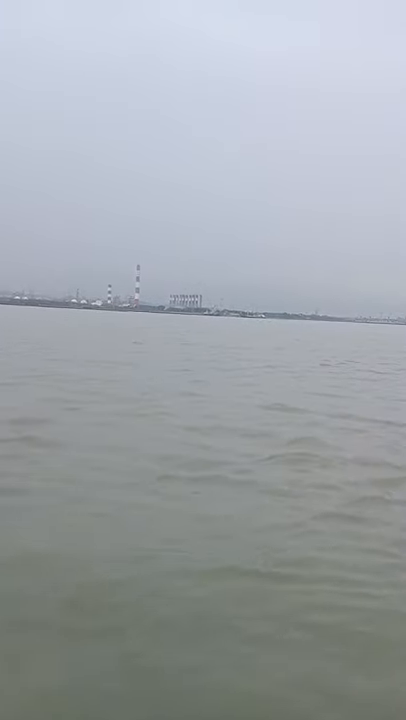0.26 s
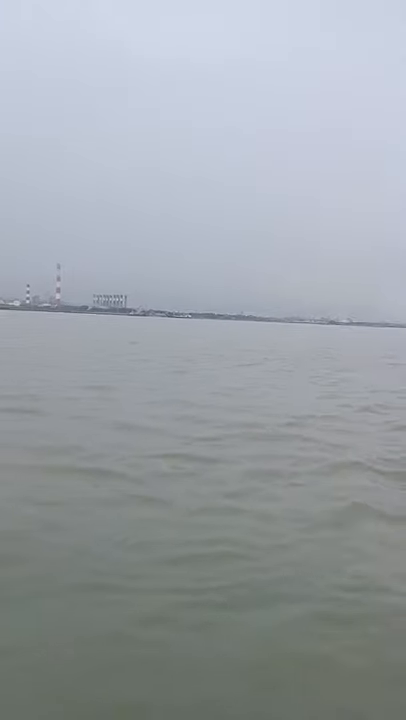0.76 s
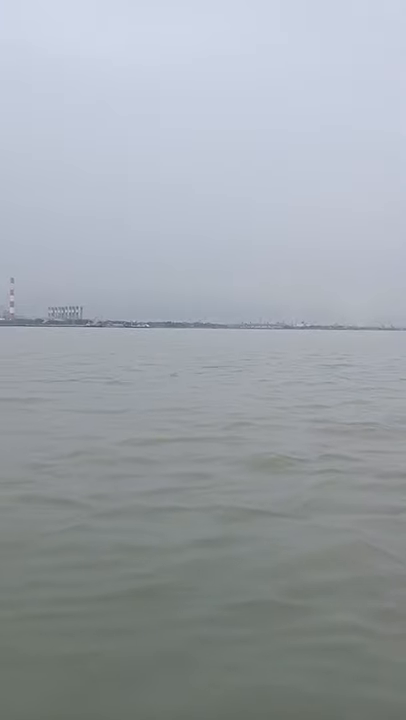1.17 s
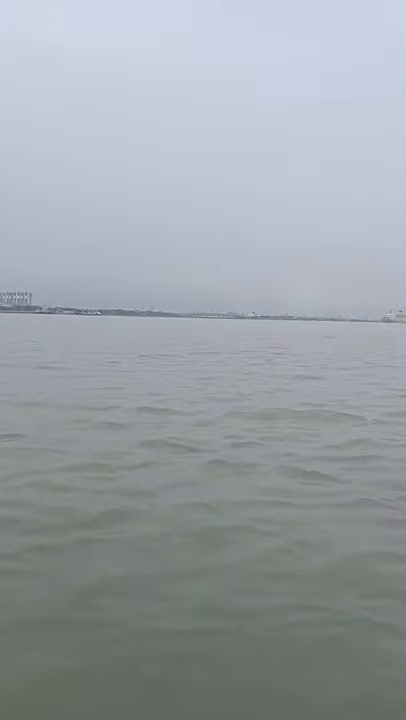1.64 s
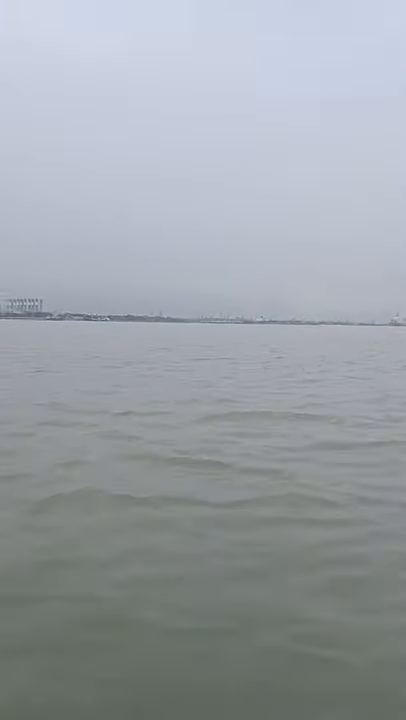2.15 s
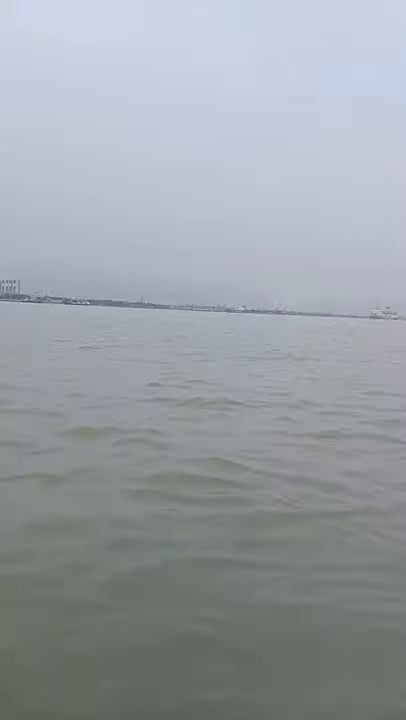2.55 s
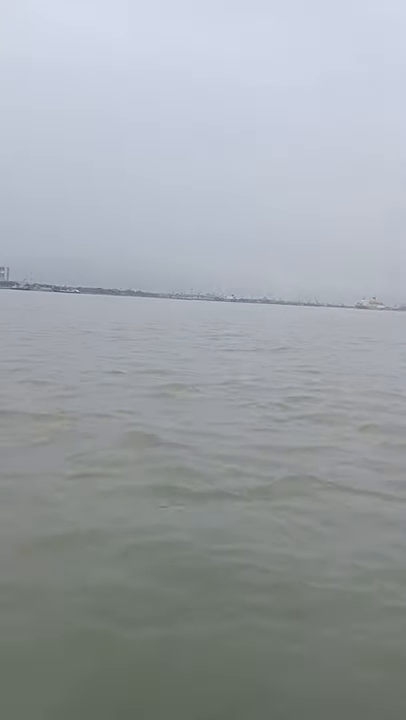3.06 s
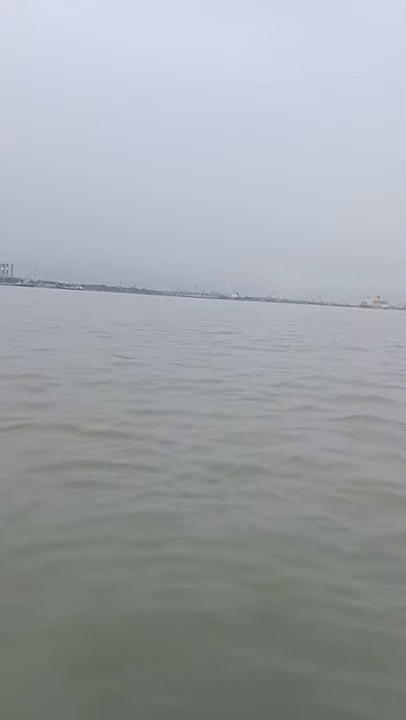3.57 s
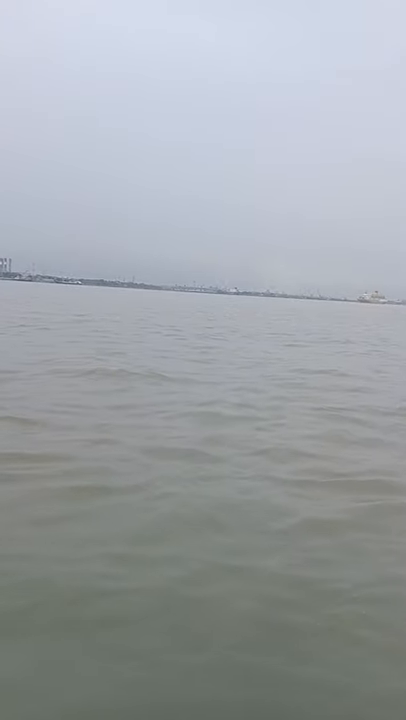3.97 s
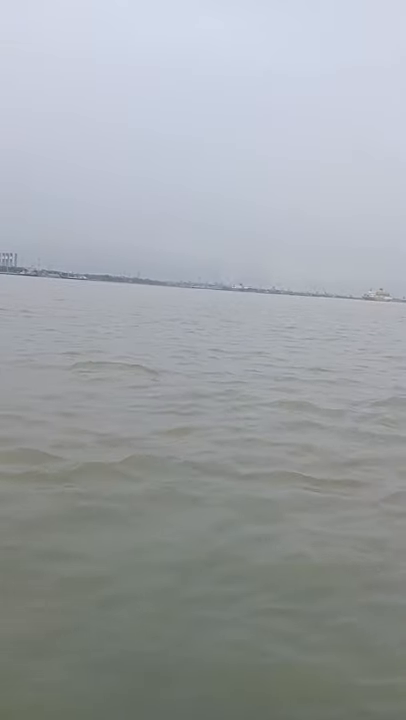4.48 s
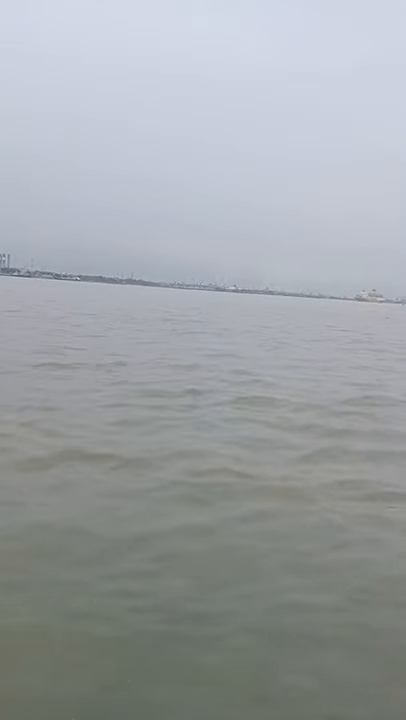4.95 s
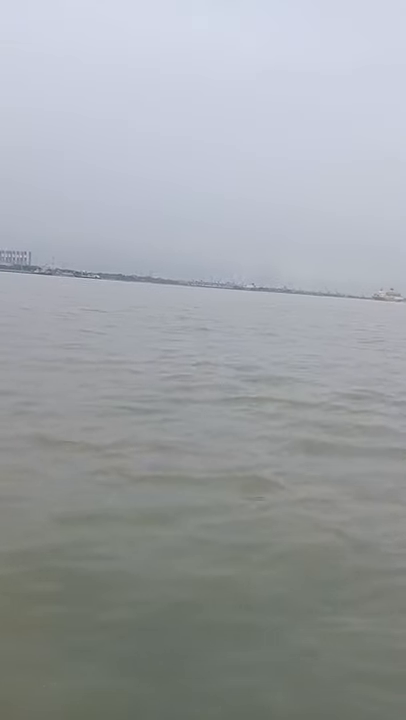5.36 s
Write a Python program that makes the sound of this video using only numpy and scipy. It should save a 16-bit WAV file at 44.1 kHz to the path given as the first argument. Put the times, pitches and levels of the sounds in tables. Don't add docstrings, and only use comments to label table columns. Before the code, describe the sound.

On the open deck of a river boat under way, a diesel engine drones at nearly constant speed, deep and throbbing. A metal plate hums and wavers in the midrange, gears whine thinly, and sharp little valve ticks stand out irregularly. Breathy intake whistle and faint water hiss sit far behind. One close microphone, mono, dense from start to end.

```python
import sys
import numpy as np
from scipy import signal
from scipy.fft import rfft, irfft
from scipy.io import wavfile
from scipy.ndimage import uniform_filter1d

SR = 44100
rng = np.random.default_rng(int(sys.argv[2]) if len(sys.argv) > 2 else 0)


def dump_mix(stems):
    frames = np.atleast_2d(stems).T
    limited = np.clip(frames, -1, 1)
    pcm = np.round(limited * 32767).astype(np.int16)
    wavfile.write(sys.argv[1], SR, pcm)


def field_ratio(decibels):
    return 10 ** (np.asarray(decibels, dtype=float) / 20)


N = 247842

SHAFT_HZ = 3.6655
THROB_AT = 0.53


def rms_one(x):
    return x / np.sqrt(np.mean(x ** 2) + 1e-20)


def in_time(rows):
    s, *columns = np.transpose(rows)
    t = np.arange(N) / SR
    return [np.interp(t, s, column) for column in columns]


def drift(rate):
    hop, settle = 40, 2000
    r = np.exp(-2 * np.pi * rate * hop / SR)
    noise = rng.standard_normal(N // hop + settle + 2)
    slow = signal.lfilter([1], [1, -2 * r, r * r], noise)[settle:]
    return np.interp(np.arange(N) / hop, np.arange(len(slow)), rms_one(slow))


def swells(rows, rest_db, lift_db, edge_s):
    t, out = np.arange(N) / SR, np.full(N, float(rest_db))
    for s, length, level_db in rows:
        end, top_db = s + length, level_db + lift_db
        corners = [s - edge_s, s + edge_s / 2, end - edge_s / 2, end + edge_s]
        out = np.maximum(out, np.interp(t, corners, [rest_db, top_db, top_db, rest_db]))
    return out


def coloured(spectrum):
    hz, level_db = np.transpose(spectrum)
    grid = np.arange(N // 2 + 1) * SR / N + 1
    gain = field_ratio(np.interp(np.log(grid), np.log(hz), level_db))
    return rms_one(irfft(rfft(rng.standard_normal(N)) * gain, N))


def resonate(x, hz, width):
    r = np.exp(-np.pi * width / SR)
    poles = [1, -2 * r * np.cos(2 * np.pi * hz / SR), r * r]
    return signal.lfilter([(1 - r * r) / 2, 0, (r * r - 1) / 2], poles, x)


def noise_mode(hz, width):
    return rms_one(resonate(resonate(rng.standard_normal(N), hz, width), hz, width))


def tone(turns, level_db):
    return np.sqrt(2) * field_ratio(level_db) * np.cos(2 * np.pi * turns)


# t/s, f/Hz (four-stroke cycles)
SPEED = [(0, 12.51), (2.5, 12.51), (2.9, 12.43), (4.4, 12.43), (4.8, 12.5), (5.62, 12.5)]


def engine_cycle():
    return np.cumsum(in_time(SPEED)[0]) / SR


# t/s, level/dB
LOAD = [(0, -28), (.3, -28), (2.5, -28.5), (3.8, -28.5), (5.6, -28.5)]


def load_swing():
    load_db, = in_time(LOAD)
    return load_db - load_db.mean()


# f/Hz, level/dB (per Hz)
WAKE = [(3000, -31), (3900, 3), (4500, 0), (5000, -1.5), (5800, -4.5), (6500, -13.5), (7100, -10.5),
        (8200, -9), (9200, -16.5), (10500, -23), (12000, -25.5), (13500, -19), (15500, -22.5), (17000, -35)]
# t/s, f/Hz, length/s, level/dB (rms)
SQUEAK = (1.14, 12500, .04, -75)


def wake(load_db):
    s, hz, length, level_db = SQUEAK
    t = np.arange(N) / SR
    squeak = np.exp(-((t - s) / length) ** 2) * rms_one(resonate(rng.standard_normal(N), hz, 120))
    hiss_db = -50 + 1.5 * load_db + 0.77 * drift(13.0)
    return field_ratio(hiss_db) * coloured(WAKE) + field_ratio(level_db) * squeak


# f/Hz, width/Hz, share/dB
INTAKE = [(3610, 107, -2), (3698, 110, -4.5)]
# t/s, length/s, level/dB
GULPS = [(0.31, 0.034, -39), (1.13, 0.04, -37), (2.118, 0.061, -38.5), (2.384, 0.03, -41),
         (2.5, 0.064, -38.5), (2.645, 0.033, -36.5), (3.306, 0.058, -37), (3.374, 0.077, -40.5),
         (3.573, 0.035, -39), (3.83, 0.046, -41), (3.956, 0.056, -37), (5.133, 0.038, -38),
         (5.341, 0.16, -37.5)]


def intake():
    flow_db = swells(GULPS, rest_db=-43, lift_db=-1, edge_s=0.02) + 1.8 * drift(9.1)
    return sum(field_ratio(flow_db + share_db) * noise_mode(hz, width) for hz, width, share_db in INTAKE)


# t/s, length/s, level/dB
PLATE_RINGS = [(0.197, 0.034, -23), (0.353, 0.054, -24), (0.468, 0.052, -26), (0.691, 0.12, -24.5),
               (0.869, 0.033, -27), (1.122, 0.25, -24.5), (1.437, 0.028, -19.5), (1.523, 0.066, -23.5),
               (1.631, 0.248, -24.5), (1.882, 0.074, -27), (2.005, 0.15, -26.5), (2.307, 0.06, -27.5),
               (2.394, 0.04, -23), (2.476, 0.33, -25.5), (2.815, 0.032, -28), (2.996, 0.14, -24.5),
               (3.405, 0.056, -25.5), (4.009, 0.053, -22), (4.127, 0.038, -24), (4.327, 0.046, -24.5),
               (4.506, 0.106, -23.5), (4.74, 0.042, -26.5), (4.825, 0.081, -19.5), (4.997, 0.05, -25.5),
               (5.073, 0.069, -25.5), (5.209, 0.037, -22), (5.293, 0.032, -22), (5.352, 0.11, -24.5),
               (5.496, 0.056, -25)]


def deck_plate():
    ring_db = swells(PLATE_RINGS, rest_db=-30.5, lift_db=3.5, edge_s=0.024) + 1.95 * drift(13.0)
    ring = resonate(resonate(rng.standard_normal(N), 1007, 15.6), 991, 70)
    power = uniform_filter1d(ring ** 2, size=1300)
    return field_ratio(ring_db) * ring / np.sqrt(power + 0.24 * ring.var())


# t/s, level/dB (peak), f/Hz
TICKS = [(0.158, -17.5, 2356), (0.6649, -19, 2930), (0.7195, -20.5, 2810), (1.052, -14.5, 2206),
         (1.0907, -20, 2170), (1.5107, -15, 2260), (1.919, -13.5, 2290), (2.185, -18, 2290),
         (2.321, -17.5, 2046), (2.4806, -15.5, 2830), (2.6663, -20.5, 2680), (2.9063, -24.5, 2290),
         (2.9607, -17.5, 2990), (3.3628, -26, 2380), (3.548, -23.5, 2680), (3.711, -15, 2804),
         (3.791, -13, 2750), (3.951, -17, 2790), (4.5517, -16.5, 2274), (4.7286, -22, 2090),
         (4.995, -18, 2140), (5.5104, -18, 2200)]


def valves(cycle):
    first = np.diff(cycle // 1) > 0
    second = np.diff((cycle - 1 / 3) // 1) > 0
    seats = np.flatnonzero(first | second)
    draws = rng.standard_normal((len(seats), 2))
    soft = [(i / SR, -27.5 + 2.0 * a, 2600 + 200 * b) for i, (a, b) in zip(seats, draws)]
    hard = [(s, peak_db - 2.5, hz) for s, peak_db, hz in TICKS]
    length = 900
    out, age = np.zeros(N + length), np.arange(length) / SR
    shape = (1 - np.exp(-age / 0.0007)) ** 2 * np.exp(-age / 0.0016)
    shape /= shape.max()
    for s, peak_db, hz in soft + hard:
        pair = np.sin(2 * np.pi * hz * age) + 0.39 * np.sin(2 * np.pi * 1.1 * hz * age)
        out[round(s * SR):][:length] += field_ratio(peak_db) * shape * pair
    return out[:N]


# f/Hz, level/dB (rms)
WHINES = [(585, -48), (704, -46), (762, -52), (1192, -50), (1386, -50), (1585, -52), (1660, -47),
          (1788, -52), (1939, -50), (2773, -52), (4362, -72), (13270, -90), (13840, -88), (14750, -88),
          (2782, -49), (2906, -52), (3114, -60)]
# t/s, f/Hz, level/dB (rms)
MESH = [(0, 1449, -43), (.75, 1450, -34), (1.15, 1446, -37), (1.6, 1455, -31), (2.4, 1452, -40.5),
        (2.55, 1452, -34.5), (3.45, 1451.5, -37), (3.9, 1455, -29.5), (4.25, 1445, -41.5),
        (5.6, 1437, -38.5)]


def gears(wander, sway_db):
    load = drift(0.81)
    slack = np.cumsum(1 + wander * (load - load.mean())) / SR
    out = sum(tone(hz * slack + rng.random(), level_db + 2.5 + sway_db * drift(6.0))
              for hz, level_db in WHINES)
    mesh_hz, mesh_db = in_time(MESH)
    return out + tone(np.cumsum(mesh_hz) / SR, mesh_db + 0.7 + 0.7 * drift(6.0))


SHAFT_ORDERS = [14, 16, 19, 21, 22, 23, 25, 26, 42, 52, 54, 57]
SHAFT_DB = [-52, -43.5, -47.5, -43, -43, -39.5, -45, -36.5, -40, -37, -40.5, -47]


def shaft(sway_db):
    turns = SHAFT_HZ * np.arange(N) / SR
    starts = rng.random(len(SHAFT_DB))
    return sum(tone(k * turns + start, level_db + sway_db * drift(1.0))
               for k, start, level_db in zip(SHAFT_ORDERS, starts, SHAFT_DB))


# f/Hz, level/dB (per Hz)
ROAR = [(15, -58.5), (25, -30.5), (81, -10), (125, -7), (196, -8), (276, -10.5), (452, -8.5), (560, -13),
        (823, -15), (999, -12.5), (1110, -16), (1440, -15), (2860, -22.5), (3690, -29.5), (4200, -48),
        (5460, -79), (9240, -120)]
# f/Hz, width/Hz, level/dB (rms)
PANELS = [(95, 36, -36.5), (203, 58, -33.5), (467.4, 70, -32), (911, 40, -47.5), (1050, 58, -49),
          (1909, 250, -36.5), (2380, 52, -43), (2857, 390, -50), (2290, 130, -45), (1269, 100, -41)]


def roar(cycle, load_db):
    firing_db = 1.1 * np.cos(2 * np.pi * 6 * cycle)
    uneven_db = 0.9 * np.cos(2 * np.pi * (cycle - 0.3))
    panels = sum(field_ratio(level_db + 2.6 * drift(6.1)) * noise_mode(hz, width)
                 for hz, width, level_db in PANELS)
    return field_ratio(firing_db + uneven_db + 1.5 * load_db) * (field_ratio(-23) * coloured(ROAR) + panels)


# t/s, level/dB (rms, seventh order), level/dB (rms, shaft tone)
GRIP = [(0, -34.5, -46), (.3, -29, -34.5), (1.1, -27.5, -28.5), (1.8, -30, -30.5), (2.6, -25, -28),
        (3.3, -30, -33), (3.8, -27, -26), (4.7, -34.5, -36.5), (5.4, -27, -39)]


def boom(cycle, sway_db):
    t = np.arange(N) / SR
    seventh_db, shaft_db = in_time(GRIP)
    seventh = 7 * (cycle - THROB_AT)
    side = tone(seventh + SHAFT_HZ * t + 0.2, -41)
    neighbour = tone(88.02 * t - 0.05, shaft_db)
    return tone(seventh, seventh_db + sway_db * drift(4.4)) + side + neighbour


ENGINE_ORDERS = [1, 3, 4, 5, 9, 10, 12, 13, 14, 15, 16, 17, 18, 19, 20, 21, 24, 26, 30, 32, 36, 37, 40, 42]
ENGINE_DB = [-55, -53, -57.5, -39.5, -37, -47, -42, -37, -35, -54, -37, -43.5, -36, -36, -43, -40.5, -40.5,
             -41.5, -46.5, -43.5, -34.5, -48, -48, -44]


def engine(cycle, sway_db):
    out = tone(6 * (cycle - THROB_AT), -30)
    for k, level_db in zip(ENGINE_ORDERS, ENGINE_DB):
        start = rng.random() * (k != 5)
        out += tone(k * (cycle - THROB_AT) + start, level_db + sway_db * drift(3.2))
    return out


# t/s, length/s, level/dB
WAVES = [(0.269, 0.062, -21.5), (0.435, 0.056, -22.5), (0.525, 0.11, -21.5), (0.766, 0.182, -23.5),
         (1.243, 0.08, -21), (1.451, 0.136, -23), (1.7, 0.053, -22.5), (1.832, 0.164, -22),
         (2.023, 0.03, -19.5), (2.099, 0.05, -21.5), (2.197, 0.23, -21), (2.648, 0.057, -21.5),
         (2.834, 0.027, -20), (2.953, 0.043, -21), (3.159, 0.088, -24), (3.472, 0.04, -22),
         (3.552, 0.036, -20.5), (3.757, 0.072, -22), (3.931, 0.063, -20.5), (4.025, 0.1, -21),
         (4.342, 0.062, -20), (4.522, 0.062, -21.5), (4.919, 0.05, -22.5), (5.045, 0.2, -23),
         (5.24, 0.08, -21.5), (5.384, 0.073, -20.5), (5.515, 0.058, -21.5)]


def shudder(x):
    wave_db = swells(WAVES, rest_db=-23.5, lift_db=0.5, edge_s=0.03)
    for low_hz, high_hz in [(130, 330), (380, 560)]:
        bandpass = signal.butter(2, [low_hz, high_hz], "band", fs=SR, output="sos")
        band = signal.sosfiltfilt(bandpass, x)
        flex_db = wave_db - wave_db.mean() + 0.85 * drift(6.6)
        x = x + (field_ratio(flex_db) - 1) * band
    return x


def scene():
    cycle, load_db = engine_cycle(), load_swing()
    air = wake(load_db) + intake()
    whines = deck_plate() + gears(wander=0.0012, sway_db=3.5)
    machinery = shaft(sway_db=2.0) + roar(cycle, load_db)
    machinery += boom(cycle, sway_db=1.7) + engine(cycle, sway_db=0.5)
    return (air + whines + valves(cycle) + shudder(machinery))[None]


def band_limit(x):
    return signal.sosfilt(signal.butter(12, 15560, fs=SR, output="sos"), x)


def record(dry):
    mix = 2.5 * np.tanh(dry / 2.5)
    return band_limit(mix)


dry = scene()
out = record(dry)
dump_mix(out)
```